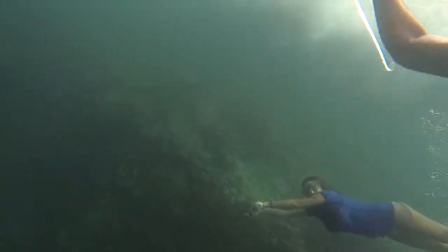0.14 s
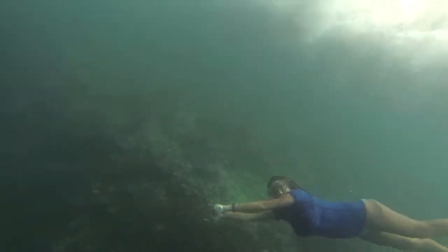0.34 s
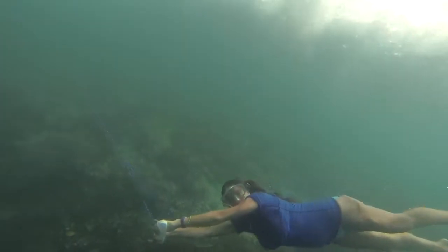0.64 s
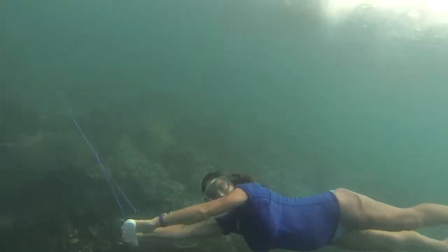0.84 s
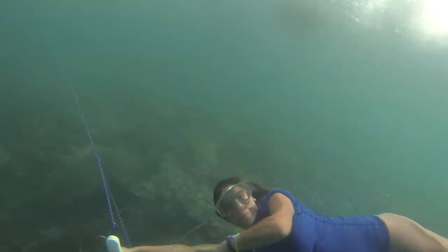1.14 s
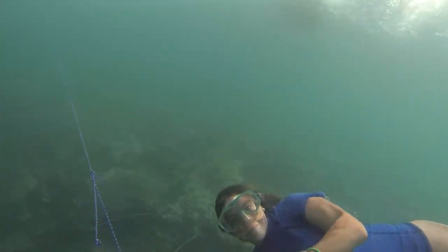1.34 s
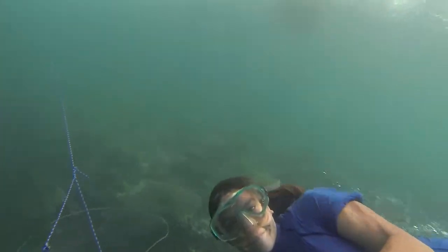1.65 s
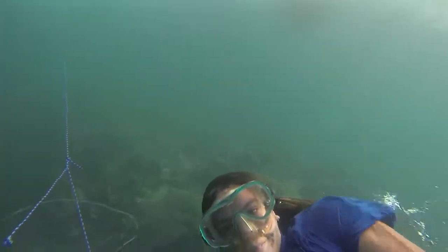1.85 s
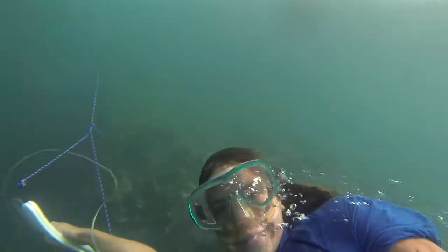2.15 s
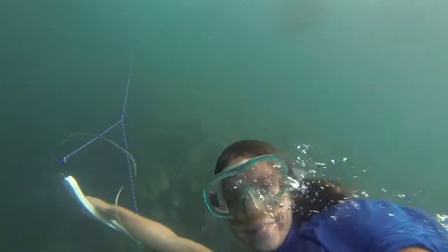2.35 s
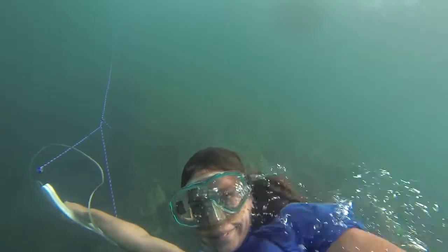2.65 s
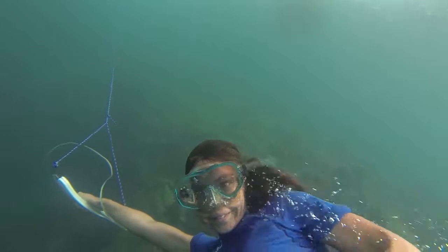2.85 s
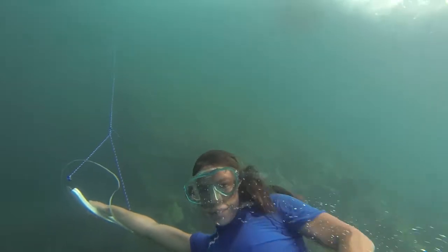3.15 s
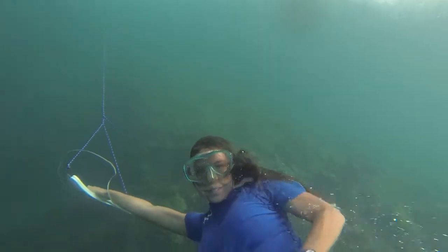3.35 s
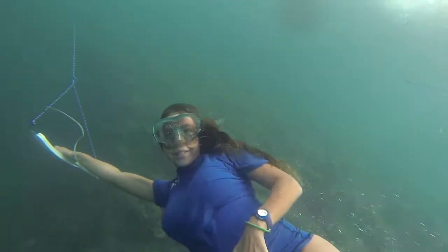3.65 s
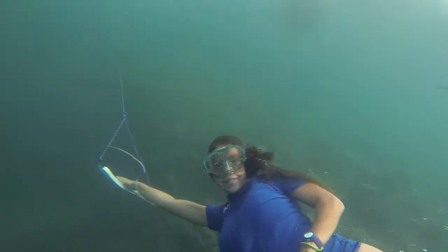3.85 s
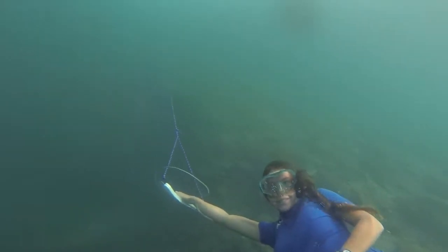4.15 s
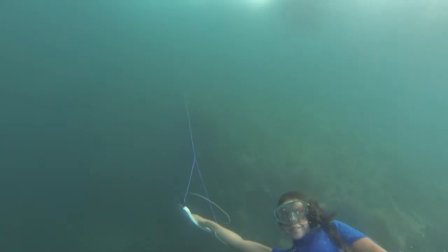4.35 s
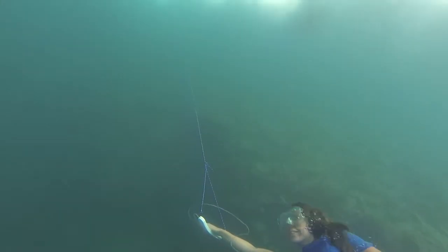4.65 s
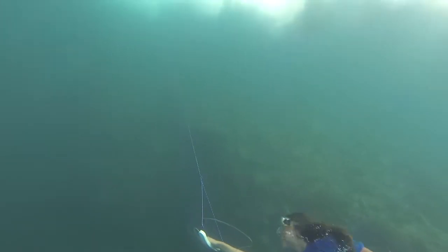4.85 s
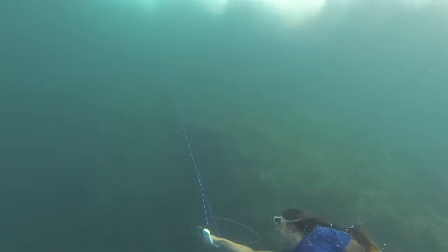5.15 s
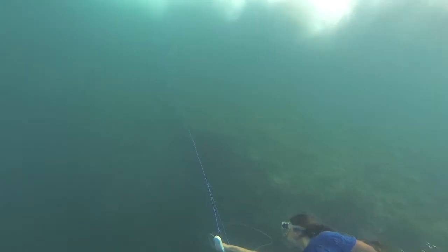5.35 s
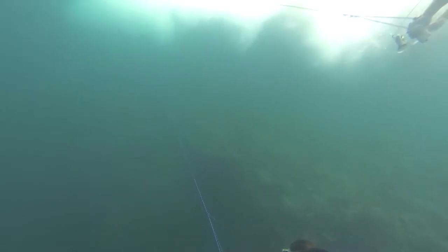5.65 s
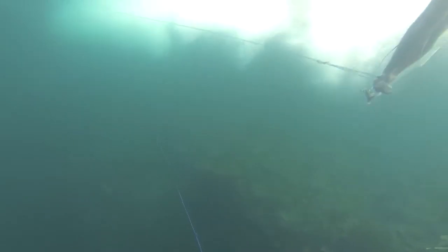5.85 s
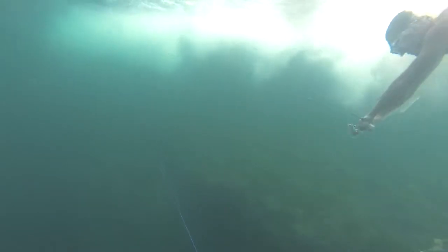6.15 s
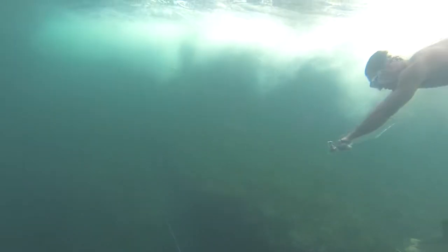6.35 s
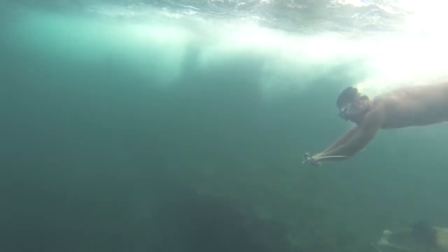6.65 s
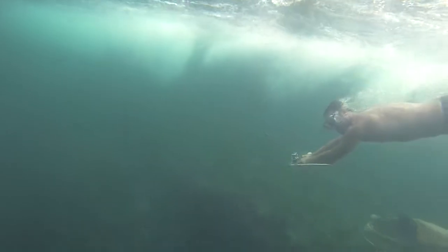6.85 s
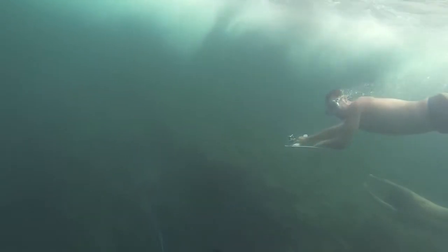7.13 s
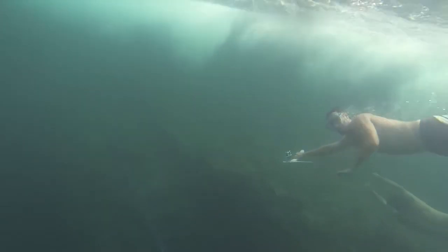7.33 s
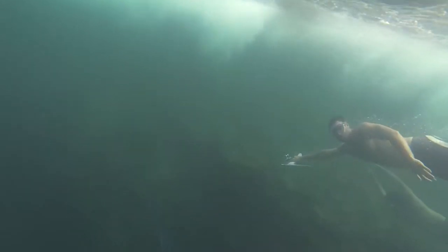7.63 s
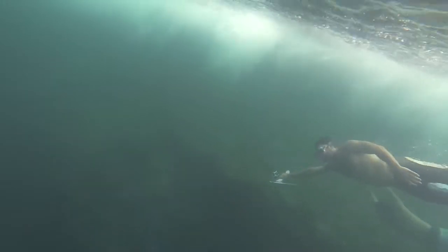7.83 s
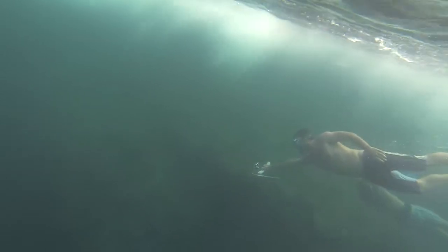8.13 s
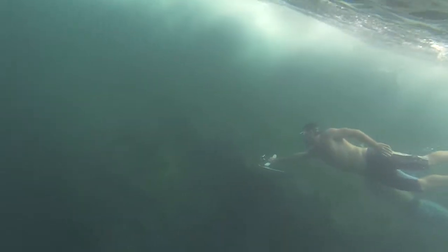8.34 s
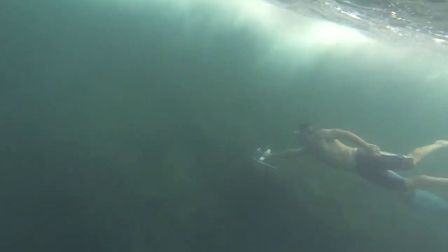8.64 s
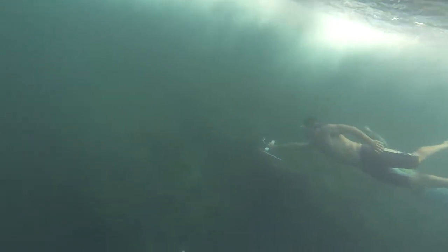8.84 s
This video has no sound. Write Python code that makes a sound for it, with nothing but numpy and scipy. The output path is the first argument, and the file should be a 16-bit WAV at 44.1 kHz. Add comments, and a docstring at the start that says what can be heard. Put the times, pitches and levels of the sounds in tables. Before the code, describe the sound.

A deep, gusting rumble of water runs for all nine seconds, heard underwater from inside a sealed housing, with a surging hiss of tiny bubbles above it. A motorboat's low, slightly wavering drone swells within the first second and holds. Sharp little ticks strike the case irregularly throughout. Close bubbles plip in a cluster around 1.3 seconds and more densely from 2 to 2.7. A low, round double gulp of air comes at about 4.6 seconds. From around 5 seconds the drone roughens and weakens, returning briefly near 7.3 and vanishing by 7.8. Between 6 and 7.6 seconds eddies give the housing several blunt, soft thumps, while lower plips and gurgling thicken. A deep, ringing gulp sounds at about 8 seconds, and rumble, hiss and scattered plips and ticks continue to the end.

```python
"""A deep, gusting rumble of water and a motorboat's low, wavering drone: swimmers towed under water,
heard from inside a sealed camera housing. Eddies buffet and thump the housing, and the wake hisses
with tiny ringing bubbles. Larger bubbles plip close by, air pockets gulp, and sharp ticks strike
the case. Late on, the drone roughens and fades as the housing rises towards the surface."""
import sys
import numpy as np
from scipy import signal
from scipy.fft import rfft, irfft
from scipy.io import wavfile
from scipy.ndimage import uniform_filter1d

SR = 44100
rng = np.random.default_rng(int(sys.argv[2]) if len(sys.argv) > 2 else 0)


def file_out(sig):
    """Save sig as 16-bit WAV at sys.argv[1]."""
    # one column per channel
    cols = np.atleast_2d(sig).T
    # limit, then scale
    lim = np.clip(cols, -1, 1)
    pcm = np.round(lim * 32767).astype(np.int16)
    wavfile.write(sys.argv[1], SR, pcm)


N = 396459
TIME = np.arange(N) / SR

# water rushing past the housing: (time [s], slow eddies [dB], buffeting [dB], fine churn [dB])
FLOW_LEVELS = [(0, -17.5, -23.5, -36), (1.0, -20.5, -21.5, -36.5), (1.75, -20.5, -24.5, -36),
               (2.05, -21.5, -29, -39), (2.65, -29, -28.5, -42.5), (3.3, -18, -27.5, -42),
               (3.55, -19.5, -27, -42.5), (3.75, -20.5, -21, -34.5), (4.1, -20, -22.5, -38.5),
               (4.35, -22, -26, -39.5), (5.7, -28.5, -25.5, -40.5), (6.1, -20, -27, -44.5),
               (6.4, -22, -28, -42), (6.7, -21.5, -21, -36), (7.5, -21, -22, -36),
               (7.85, -23.5, -25, -39.5), (8.25, -23, -25.5, -39.5), (8.5, -19.5, -23.5, -36),
               (8.7, -22.5, -28, -39), (9, -24.5, -27, -41)]
# sub rumble of the big, slow eddies: (frequency [Hz], level [dB])
EDDY_SPECTRUM = [(1, -15), (5, 0.5), (14, 12.5), (24, 14.5), (34, 7), (46, -4), (62, -17), (110, -66)]
# bass buffeting of the mid-sized eddies: (frequency [Hz], level [dB])
BUFFET_SPECTRUM = [(25, -20), (40, -1), (55, 2.5), (72, -3.5), (95, -5), (125, -11.5), (160, -21),
                   (240, -38), (500, -91.5)]
# low-mid churn of the finest eddies: (frequency [Hz], level [dB])
CHURN_SPECTRUM = [(70, -30), (115, -11.5), (148, 1), (190, -7), (245, -9.5), (310, -17.5), (420, -21.5),
                  (600, -24.5), (1000, -37.5), (3000, -86)]
# single eddies hitting the housing: (time [s], peak [dB], half-width [s])
EDDY_THUMPS = [(0.595, -13.5, 0.0038), (2.896, -11.5, .004), (6.084, -13.5, 0.0056), (6.182, -13, 0.011),
               (7.058, -10.5, 0.0085), (7.199, -12, 0.0025), (7.333, -12, 0.0059), (7.417, -8.5, 0.0028),
               (7.619, -9, 0.0068)]
# the engine's drone: (time [s], pitch [Hz], level [dB])
ENGINE_DRONE = [(0, 120, -38), (.4, 122.5, -29.5), (.8, 123.5, -24.5), (1.1, 122.5, -26),
                (1.35, 120, -25.5), (1.55, 122, -22.5), (1.95, 122, -26), (2.25, 116.7, -25),
                (2.7, 113.3, -30), (3.0, 116.5, -29.5), (3.3, 117.5, -29.5), (3.66, 121.7, -26.5),
                (3.8, 124, -21.5), (3.95, 123, -26.5), (4.1, 123.5, -29.5), (4.6, 123.5, -26.5),
                (4.95, 120, -29.5), (5.6, 121.3, -31), (6.3, 120.3, -34.5), (6.8, 115, -40),
                (7.3, 111.5, -30.5), (7.8, 112, -56), (9, 112, -57)]
# close-up plips: (time [s], level [dB], pitch [Hz], share that rings on after the burst [0-1])
NEAR_BUBBLES = [(0.0664, -38.5, 4320, .9), (0.6144, -31.5, 2340, 0), (1.1715, -26.5, 1700, 0.6),
                (1.2994, -26, 1440, 0.5), (1.317, -28, 1730, .5), (1.3398, -22, 1400, 0.2),
                (1.341, -23, 1850, 0.6), (1.380, -27, 1580, .5), (2.044, -23, 1900, 0.3),
                (2.061, -28, 1420, .6), (2.0967, -23, 1730, 0.4), (2.179, -28, 1310, .9),
                (2.217, -24, 1440, 0.8), (2.2412, -24, 1435, 1), (2.296, -29, 1210, 0.7),
                (2.374, -29, 1280, .8), (2.3948, -17, 1850, 0.4), (2.4334, -33, 1630, 0.3),
                (2.4494, -16.5, 1430, 0.56), (2.515, -38, 2300, 0.9), (2.559, -30, 1120, 0.8),
                (2.65, -25, 1640, 0.6), (2.662, -20, 1770, .8), (2.686, -28, 1910, 0.8),
                (2.693, -25.5, 1470, .8), (2.895, -30, 1540, 0), (3.2877, -22, 1595, 0.7),
                (3.4165, -26.5, 1800, .2), (4.692, -24, 1520, .2), (4.802, -32, 2400, .2),
                (5.096, -26, 1610, 0.2), (5.2488, -24, 1673, .25), (5.397, -27.5, 1330, .9),
                (5.828, -22, 1650, 0.25), (5.927, -25.5, 1687, 0.3), (6.055, -24.5, 1465, .6),
                (6.492, -28, 1030, 0.9), (6.515, -35, 2686, .7), (6.522, -18.5, 860, 0.57),
                (6.562, -30, 1990, 0.9), (6.6736, -28, 973, 0.7), (6.778, -26, 1390, 0.77),
                (6.779, -35, 2180, 0.75), (6.845, -22.5, 816, 0.6), (6.859, -24, 1740, 0.9),
                (6.902, -23, 1520, 0.3), (6.98, -30, 777, 0.86), (7.021, -30, 940, 0.91),
                (7.269, -24.5, 777, 0.3), (7.378, -26, 1610, 0.4), (7.9586, -29.5, 1600, 0.2),
                (8.098, -33, 910, .9), (8.557, -26, 840, 0.5), (8.608, -33, 1380, 1),
                (8.957, -30, 1040, .55)]
# large pockets of air: (time [s], level before trim [dB], pitch [Hz], ring t60 [s])
AIR_GULPS = [(2.397, -20, 263, 0.18), (3.277, -31, 292, .07), (4.591, -10.5, 161, 0.099),
             (4.625, -12.5, 171.8, 0.11), (6.523, -25, 616, 0.08), (6.731, -15, 203, 0.034),
             (7.241, -21, 186.4, 0.043), (7.546, -18, 434, 0.02), (7.967, -5.5, 67.4, 0.67),
             (8.527, -16.5, 225, 0.049)]
# faders of the wake: (time [s], hiss [dB], coarse bubbles before trim [dB], fizz [dB])
WAKE_LEVELS = [(0, -42, -46, -58), (.7, -40, -54, -58.5), (1.0, -40, -45, -58.5),
               (1.7, -37.5, -47.5, -56.5), (1.95, -39.5, -50, -58), (2.2, -36.5, -48.5, -55.5),
               (2.6, -38, -49, -57.5), (3.1, -40.5, -55.5, -57.5), (3.45, -41.5, -53, -57.5),
               (3.75, -39, -48.5, -57), (4.45, -39.5, -47.5, -58.5), (4.7, -37.5, -45, -55.5),
               (5.8, -38.5, -44, -54.5), (6.4, -42, -44, -57.5), (6.9, -39.5, -42, -56),
               (7.15, -41, -45, -59), (7.58, -38.5, -46, -58), (7.66, -42, -45, -61.5),
               (8.0, -42.5, -49, -60), (9, -43, -45.5, -56.5)]
# midrange hiss of small bubbles: (frequency [Hz], level [dB])
HISS_SPECTRUM = [(500, -21.5), (900, -4), (1250, -3), (1370, -2.5), (1470, 2), (1620, 1.5), (1990, -1),
                 (2120, -5), (2240, -11.5), (2380, -7), (2850, -22), (3180, -32), (3600, -27.5),
                 (6000, -63)]
# narrow resonances in the hiss: (pitch [Hz], width [Hz], relative level [dB])
HISS_RESONANCES = [(820, 120, -25), (1033.5, 69, -14), (1471, 95, -12.5), (3194, 250, -22.5)]
# darker wash of coarse bubbles: (frequency [Hz], level [dB])
COARSE_SPECTRUM = [(200, -0.5), (400, -6.5), (600, -7.5), (720, 0), (810, -2), (920, -1), (1040, -4),
                   (1150, -3.5), (1400, -22.5), (2500, -60)]
# bright fizz of fine bubbles: (frequency [Hz], level [dB])
FIZZ_SPECTRUM = [(1800, -6.5), (3000, 7), (3700, -1.5), (4400, -0.5), (5000, -7.5), (5600, -8.5),
                 (6500, -14), (8200, -17), (10000, -19), (14000, -37.5)]
# bubble clouds sweeping by: (centre time [s], length [s], level [dB], pitch [Hz], width [Hz])
BUBBLE_CLOUDS = [(0.173, 0.22, -38.5, 1220, 260), (0.407, 0.42, -41, 1215, 210),
                 (1.379, 0.16, -38, 1560, 400), (1.352, .12, -62, 4400, 700),
                 (2.091, 0.057, -46, 2880, 2190), (2.251, 0.11, -40.5, 1240, 400),
                 (2.529, .05, -41, 1870, 400), (2.682, 0.083, -41, 1800, 350), (2.27, .14, -64, 4970, 3000),
                 (2.854, .9, -69, 5500, 1200), (4.64, 0.13, -35.5, 238, 160), (4.738, .05, -40, 1740, 800),
                 (5.248, 0.032, -36, 1300, 1100), (5.371, .05, -43, 1260, 400),
                 (5.603, .035, -45, 1670, 500), (6.922, 0.26, -39.5, 1520, 400),
                 (7.27, 0.03, -36, 1700, 450), (7.441, 0.36, -44.5, 424, 400),
                 (7.553, 0.076, -41, 430, 250), (7.493, .12, -67, 7200, 1390), (7.7, 3.2, -77.5, 7500, 850),
                 (8.19, 2.1, -63, 2600, 350)]
# sharp ticks on the case: (time [s], level [dB], snap pitch [Hz], brightness [dB])
CASE_TICKS = [(.1463, -44, 4800, -12), (.174, -40, 4370, -7), (.2937, -34, 4230, -7.5),
              (.5679, -39, 4200, -13), (.5942, -39.5, 3900, -11), (.6148, -33, 3350, -25),
              (.7318, -32, 4100, -18), (1.3512, -37, 4160, -1), (1.7675, -40.5, 4500, -18),
              (1.7957, -36, 3780, -12), (1.878, -36, 4130, -22), (2.062, -41, 4850, -20),
              (2.2633, -44, 3600, -3), (3.4155, -40, 3600, -7), (3.4628, -41, 3900, -9),
              (3.6026, -45, 3500, -4), (4.5328, -36, 3900, -14), (4.6994, -39, 3590, -4),
              (4.7433, -41, 4200, -11), (4.8776, -38, 3800, -9), (5.3152, -34, 3273, -17),
              (5.63, -36, 3700, -10), (5.6858, -49, 3800, 1), (5.8657, -49, 4210, -3),
              (5.997, -41, 3700, -5), (6.384, -43, 3800, -4), (6.488, -43, 5300, -15),
              (6.557, -47, 5000, -9), (6.6512, -38, 4220, -9), (6.9015, -36, 3473, -14),
              (7.198, -42, 4300, -10), (7.3323, -47, 3500, -1), (7.4163, -40, 3400, -9),
              (7.615, -42, 3800, -7), (7.7253, -46, 3700, -1), (8.071, -42, 4470, -4),
              (8.4124, -47, 5630, 0), (8.5765, -43, 4100, -19), (8.596, -48, 3600, 7.5),
              (8.681, -37.5, 4450, -7.5)]
# ringing modes of the case: (pitch [Hz], relative level [dB], t60 [s])
CASE_MODES = [(1510, 7.5, 0.023), (2320, 8, .012), (3300, 0.5, 0.015), (3830, -7, 0.0043),
              (4310, -10.5, 0.018), (4600, -5.5, 0.01), (5650, -10.5, 0.004), (6770, -5, 0.039),
              (8100, -1.5, 0.013), (7740, -3, 0.014), (8950, -2.5, 0.0065), (9700, -5, 0.0099),
              (11300, -9.5, 0.0087), (13200, -6, 0.0064)]
# dry attack of a tick: (frequency [Hz], level [dB])
CRACK_SPECTRUM = [(1500, -10), (3100, 6.5), (4500, -2), (5600, 0.5), (7000, -13), (9000, -32.5)]
# splintery top end of a tick: (frequency [Hz], level [dB])
SPLINTER_SPECTRUM = [(4500, -22), (6500, -1.5), (8000, 0.5), (10200, -2), (11300, -14), (13200, -8.5),
                     (15000, -23.5)]
# airy sizzle of the tiniest bubbles: (frequency [Hz], level [dB])
SPRAY_SPECTRUM = [(4500, -10), (5700, -7), (6300, -13), (6800, 0.5), (8200, 0), (9100, -12), (9900, 2.5),
                  (10600, -1.5), (13200, -5), (14300, -14), (15300, -32.5)]
# fader of the sizzle's thin high band: (time [s], level [dB])
THIN_BAND_LEVELS = [(0, -91), (2.0, -85), (2.35, -78), (2.9, -73), (3.3, -82), (3.7, -84), (3.9, -72),
                    (4.1, -81), (4.35, -79), (5.6, -82), (7, -92), (9, -90)]
# wet splash of a bubble pinching off: (frequency [Hz], level [dB])
SPLASH_SPECTRUM = [(400, -10), (900, 9), (2000, 16), (2800, -1), (6000, -36)]


def amp(db):
    """Decibels to gain."""
    return 10 ** (np.asarray(db) / 20)


def unit(x):
    """Scales to rms 1."""
    return x / np.sqrt(np.mean(x ** 2) + 1e-20)


def curves(rows):
    """An automation curve for each column after the time."""
    times, *columns = np.transpose(rows)
    return [np.interp(TIME, times, column) for column in columns]


def add(mix, s, sound):
    """Mixes a sound in at s seconds."""
    part = mix[max(round(s * SR), 0):][:len(sound)]
    part += sound[:len(part)]


def noise():
    """White noise as long as the scene."""
    return rng.standard_normal(N)


def colour(x, spectrum):
    """EQs to a spectrum, rolling off above its last point; rms 1."""
    hz, db = np.transpose(spectrum)
    bins = np.fft.rfftfreq(N, 1 / SR)
    gain = amp(np.interp(np.log(bins + 1), np.log(hz + 1), db)) / np.maximum(bins / hz[-1], 1) ** 2
    return unit(irfft(rfft(x) * gain, N))


def wander(rate_hz):
    """Smooth random modulation of rms 1, rolling off above the rate."""
    bins = np.fft.rfftfreq(N, 1 / SR)
    return unit(irfft(rfft(noise()) / (1 + (bins / rate_hz) ** 4), N))


def steady(x, span_s):
    """Levels out swells longer than the span."""
    return x / np.sqrt(abs(uniform_filter1d(x ** 2, max(int(span_s * SR), 1))) + 1e-9)


def pops(per_s, spread_db):
    """Random impulses, mostly small, a few large; rms 1."""
    size = amp(spread_db * np.minimum(rng.exponential(1, N), 5))
    return unit(size * rng.choice([-1, 1], N) * (rng.random(N) < per_s / SR))


def resonate(x, hz, width_hz):
    """Rings a signal through one resonance; rms 1."""
    t = np.arange(SR // 10) / SR
    ring = t * np.exp(-np.pi * width_hz * t) * np.sin(2 * np.pi * hz * t)
    return unit(signal.oaconvolve(x, ring)[:len(x)])


def ping(db, hz, t60, rise_cycles, glide):
    """The ring of a bubble or snap: a sine swells, then bends upward as it dies."""
    t = np.arange(int(t60 * SR) + 2) / SR
    envelope = (1 - np.exp(-(t * hz / rise_cycles) ** 2)) * np.exp(-np.log(1000) * t / t60)
    return amp(db) * envelope / envelope.max() * np.sin(2 * np.pi * hz * (t + glide * t ** 2 / t60))


def swarm(low_hz, high_hz, per_s, spread_db, cycles, pitches):
    """Scattered bubbles of many sizes, each ringing for the given cycles; rms 1."""
    out = np.zeros(N)
    for hz in np.geomspace(low_hz, high_hz, pitches):
        ring = ping(0, hz, cycles / hz, rise_cycles=2.06, glide=0.052)
        for when, size in rng.random((int(per_s * N / SR / pitches) + 1, 2)):
            add(out, when * N / SR, ring * amp(-spread_db * np.log(max(size, .02))))
    return unit(out)


def flow():
    """The rumble: eddies of three sizes press on the housing in uneven gusts."""
    slow, middle, fine = rng.standard_normal((3, N))
    eddy_db, buffet_db, churn_db = curves(FLOW_LEVELS)
    eddies = amp(eddy_db + 1.3 * wander(27)) * steady(colour(slow, EDDY_SPECTRUM), 0.27)
    buffet = amp(buffet_db + 2.3 * wander(6.1)) * steady(colour(middle, BUFFET_SPECTRUM), 0.13)
    churn = amp(churn_db + 1.22 * wander(4.5)) * steady(colour(fine, CHURN_SPECTRUM), 0.34)
    return eddies + buffet + churn


def thumps():
    """A passing eddy gives the housing one blunt shove, then lets go."""
    out, t = np.zeros(N), np.arange(-SR // 20, SR // 20) / SR
    for s, db, half_width in EDDY_THUMPS:
        shove = (1 - (t / half_width) ** 2) * np.exp(-.5 * (t / half_width) ** 2)
        add(out, s + t[0], amp(db) * shove)
    return out


def engine(waver_hz=1.1, flutter_db=1.0):
    """The engine's firing tone wavers as its paths through the moving water shift."""
    hz, db = curves(ENGINE_DRONE)
    phase = 2 * np.pi * np.cumsum(hz + waver_hz * wander(11.6)) / SR
    tone = np.sqrt(2) * np.sin(phase) * amp(flutter_db * wander(30))
    blur = wander(16) * np.sin(phase) + wander(16) * np.cos(phase)
    rough = np.interp(TIME, [4.8, 7.5], [.24, .7])  # the tone smears on the rise to the surface
    return amp(db) * (np.sqrt(1 - rough ** 2) * tone + rough * blur)


def plips(burst_t60=.0075, splash_db=-9.5):
    """Near bubbles pinch off with a short burst and a wet splash, then ring on."""
    out, t = np.zeros(N), np.arange(SR // 50) / SR
    wet_noise = colour(noise(), SPLASH_SPECTRUM)
    envelope = np.exp(-t / 0.0025) * (1 - np.exp(-(t / 0.00048) ** 2))
    for s, db, hz, ring_share in NEAR_BUBBLES:
        t60 = 0.055 * (1000 / hz) ** 0.48  # small bubbles die sooner
        add(out, s, ring_share * ping(db, hz, t60, rise_cycles=1.1, glide=0.04))
        add(out, s, (1 - ring_share) * ping(db, hz, burst_t60, rise_cycles=0.77, glide=0.022))
        splash = wet_noise[int(s * SR) // 2:][:len(t)] * envelope
        add(out, s, np.sqrt(1 - ring_share) * amp(db + splash_db) * splash)
    return out


def gulps(trim_db=-8.0):
    """Big pockets of air ring low and round."""
    out = np.zeros(N)
    for s, db, hz, t60 in AIR_GULPS:
        add(out, s, ping(db + trim_db, hz, t60, rise_cycles=1.0, glide=0.021))
    return out


def hiss(clump_db=1.6):
    """Countless bubbles pop into a hiss; nearer ones stand out in clumps of ringing grains."""
    bed = colour(0.89 * noise() + 0.51 * pops(700, 1.2), HISS_SPECTRUM)
    clumps = amp(clump_db * wander(22))
    grains = swarm(1205, 2064, per_s=420, spread_db=2.4, cycles=24, pitches=24)
    rings = sum(amp(db) * resonate(noise(), hz, width) for hz, width, db in HISS_RESONANCES)
    return 0.76 * bed + 0.4 * unit(clumps * grains) + rings


def gurgle():
    """Coarse bubbles wash by, gurgling more as the swimmers near the surface."""
    blend = np.interp(TIME, [5.5, 6.8], [.28, .5])
    bed = colour(0.87 * noise() + 0.39 * pops(500, 3.8), COARSE_SPECTRUM)
    grains = swarm(720, 1180, per_s=58, spread_db=3.0, cycles=59, pitches=18)
    return np.sqrt(1 - blend ** 2) * bed + blend * grains


def fizz():
    """Fine bubbles ring so briefly that they crackle dryly."""
    bed = colour(1.04 * noise() + 0.51 * pops(1500, 3.2), FIZZ_SPECTRUM)
    grains = swarm(2500, 5570, per_s=480, spread_db=3.7, cycles=24, pitches=26)
    return 1.156 * bed + 0.42 * grains


def wake(surge_db=.95, churned_db=.9, coarse_trim_db=-1.5):
    """Three sizes of bubble surge together, harder while a swimmer churns the surface."""
    churned = np.exp(-((TIME - 6.95) / .5) ** 2)
    surge = amp((surge_db + churned_db * churned) * wander(28))
    hiss_db, coarse_db, fizz_db = curves(WAKE_LEVELS)
    body = hiss() * amp(hiss_db) + gurgle() * amp(coarse_db + coarse_trim_db)
    top = fizz() * amp(fizz_db + 1.4 * wander(45))
    return surge * (body + top)


def clouds():
    """Bubbles of like size ring together as their cloud sweeps past."""
    out = np.zeros(N)
    for s, length, db, hz, width in BUBBLE_CLOUDS:
        births = pops(per_s=600, spread_db=1.6)[:int(length * SR)]
        swell = signal.windows.tukey(len(births), .7)
        add(out, s - length / 2, amp(db) * resonate(births, hz, width) * swell)
    return out


def ticks(crack_db=-8.5, low_db=-10.5, top_db=-4, faint_per_s=24):
    """Tiny hard snaps crack and shake the case; some are dull, others ring its bright upper modes."""
    out, t = np.zeros(N), np.arange(SR // 40) / SR
    hz, mode_db, t60 = np.transpose(CASE_MODES)[:, :, None]
    upper = hz[:, 0] > 6200
    crack, splinter = colour(noise(), CRACK_SPECTRUM), colour(noise(), SPLINTER_SPECTRUM)
    attack, decay = 1 - np.exp(-t / 0.0001), np.exp(-t / .0014)
    # a soft crackle of faint ticks fills the gaps
    faint = [(when * N / SR, -56.5 + 8 * (size - .5), 3300 + 2200 * pitch, -7)
             for when, size, pitch in rng.random((int(faint_per_s * N / SR), 3))]
    for s, db, snap_hz, bright_db in list(CASE_TICKS) + faint:
        detune, phase = rng.standard_normal((2, len(CASE_MODES), 1))
        tones = np.sin(2 * np.pi * (hz * (1 + 0.019 * detune) * t + phase))
        modes = amp(mode_db) * np.exp(-np.log(1000) * t / t60) * tones
        low, top = modes[~upper].sum(0), modes[upper].sum(0)
        offset = int(s * SR) // 2
        body = amp(crack_db) * crack[offset:][:len(t)] * decay + amp(low_db) * low / abs(low).max()
        edge = 0.61 * splinter[offset:][:len(t)] * decay + amp(top_db) * top / abs(top).max()
        add(out, s, amp(db) * (body + amp(bright_db) * edge) * attack)
        add(out, s, ping(db, snap_hz, t60=.0034, rise_cycles=0.95, glide=.01))
    return out


def spray(sizzle_db=-72.5):
    """The tiniest bubbles prickle faintly; a thin high band lingers as they stream past."""
    sizzle = colour(0.79 * noise() + 0.43 * pops(400, 5.2), SPRAY_SPECTRUM)
    prickle = swarm(6000, 13500, per_s=380, spread_db=7, cycles=24, pitches=22)
    thin_band = resonate(pops(1500, 3), hz=9800, width_hz=650)
    thin_db, = curves(THIN_BAND_LEVELS)
    return amp(sizzle_db + .7 * wander(12)) * (sizzle + 0.54 * prickle) + amp(thin_db) * thin_band


def scene():
    """All layers meet in mono at the microphone inside the housing."""
    bed = engine() + flow() + wake() + spray() + clouds()
    return (bed + plips() + gulps() + ticks() + thumps())[None]


def record(dry, cutoff_hz=15100):
    """A quick fade-in, then the camera's band limit."""
    fade_in = np.minimum(TIME / .004, 1)
    lowpass = signal.firwin(255, cutoff_hz, window=("kaiser", 9), fs=SR)
    return signal.oaconvolve(dry * fade_in, lowpass[None], "same")


dry = scene()
out = record(dry)
file_out(out)
```